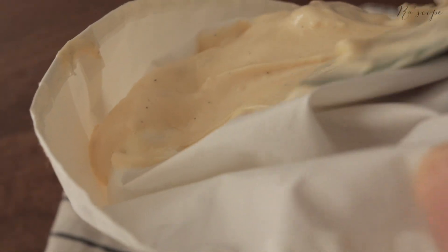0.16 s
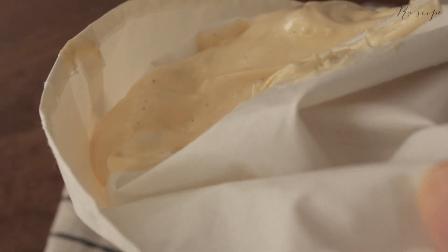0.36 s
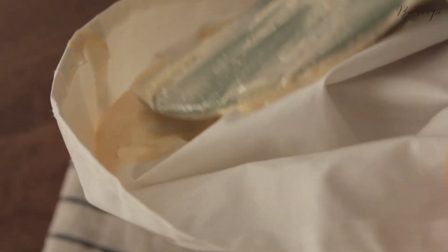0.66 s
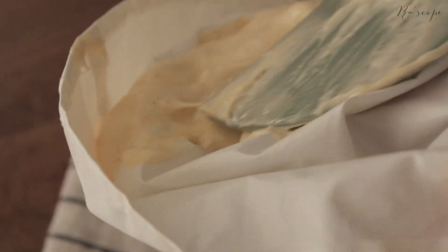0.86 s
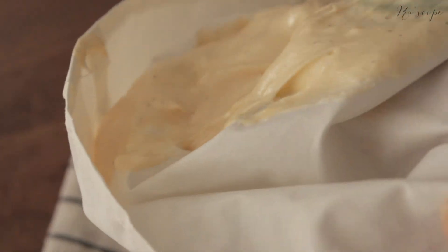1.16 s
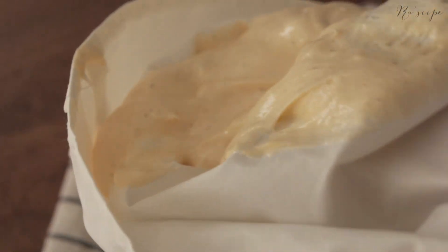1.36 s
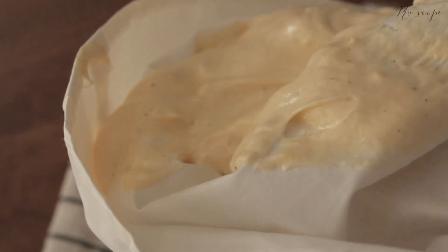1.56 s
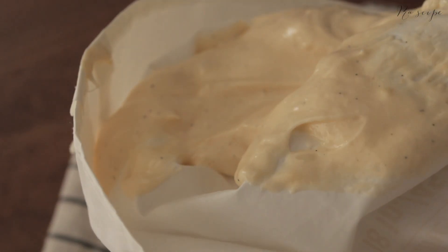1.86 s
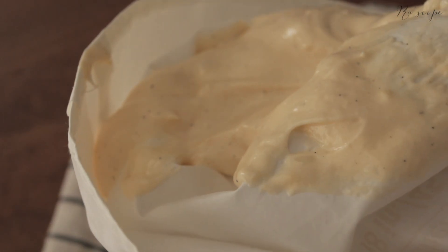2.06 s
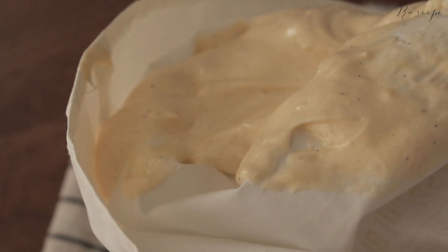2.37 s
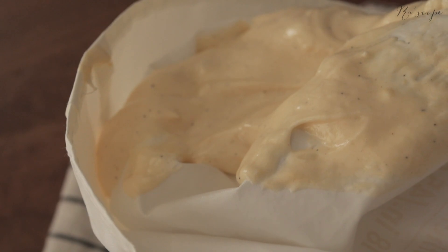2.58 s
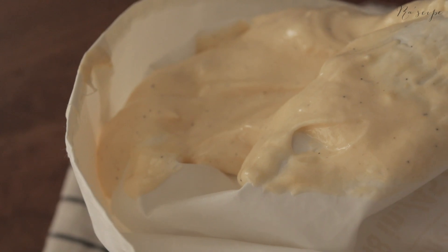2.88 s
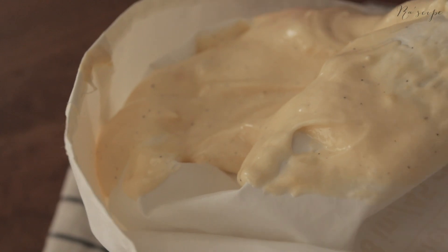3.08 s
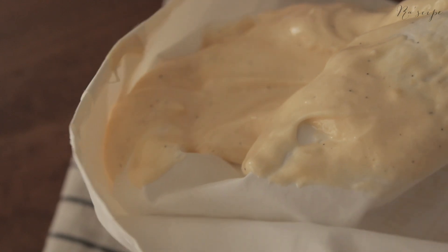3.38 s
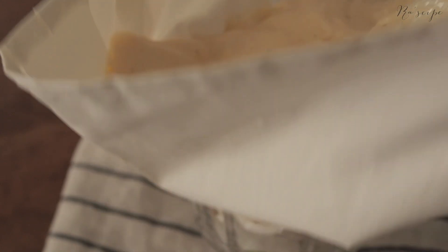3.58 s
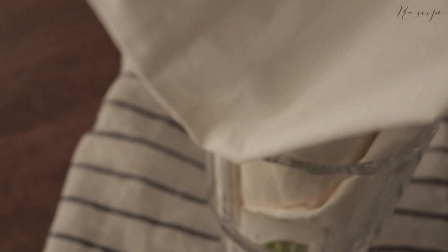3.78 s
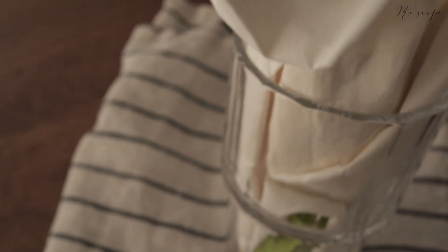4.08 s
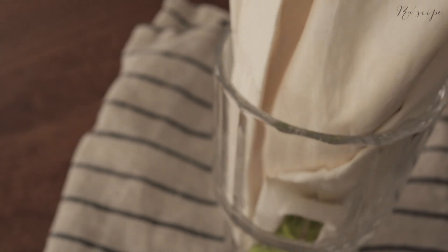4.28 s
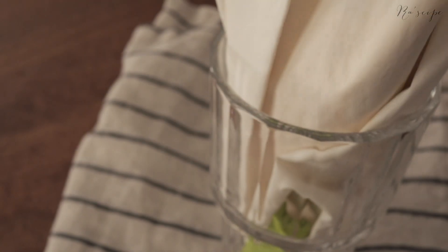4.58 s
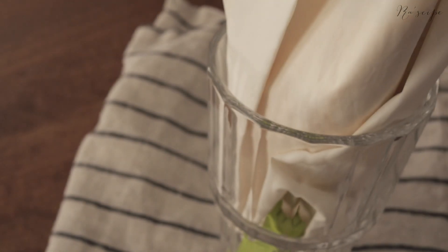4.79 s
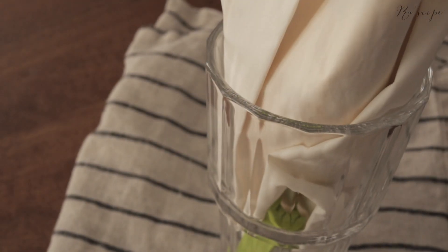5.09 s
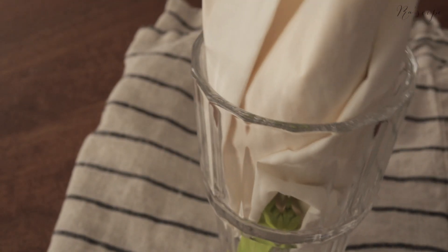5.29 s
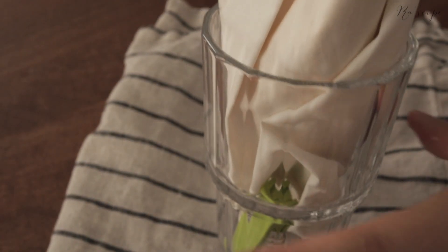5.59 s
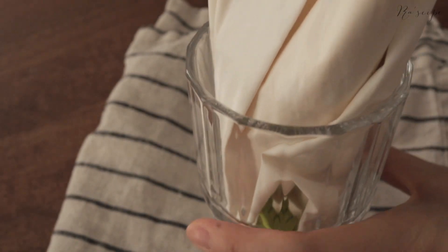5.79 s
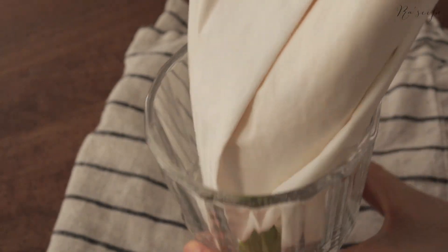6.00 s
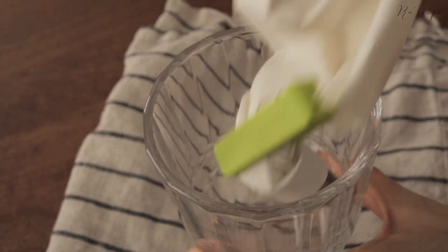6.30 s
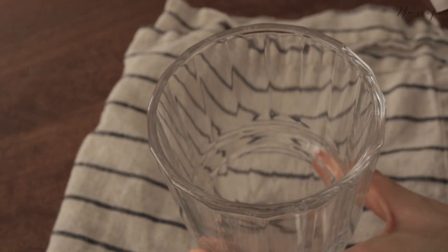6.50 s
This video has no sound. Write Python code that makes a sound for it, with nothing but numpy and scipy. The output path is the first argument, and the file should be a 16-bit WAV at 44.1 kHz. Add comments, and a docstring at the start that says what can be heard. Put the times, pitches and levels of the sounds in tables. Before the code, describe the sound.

Quiet, moist wiping and faint sheet rustle come first, briefly cut to silence and faded back in. After a calm pause a hollow woody bowl knock sounds behind. The filled bag is then gathered close to the microphone: dense crackling, dry rubbing, snapping folds and dull batter thuds. One last strong rustle, sparse bumps, then a little rim squeak and light glass taps in a small kitchen.

```python
"""A kitchen, microphone close to the hands: a stiff piping bag is filled with a spatula, folded shut
and lifted out of a drinking glass. The sheet is random grit, coloured and swelling with each stroke;
creases snap as short rings and the heavy batter thumps as low swings. The spatula knocks a bowl farther
off (dying modes with echoes). On the rim, regular slips squeak and grit sets the glass ringing.
Early on all sound stops at once and fades back in."""
import sys
import numpy as np
from scipy import signal
from scipy.fft import rfft, irfft
from scipy.io import wavfile
from scipy.ndimage import uniform_filter1d

SR = 44100
rng = np.random.default_rng(int(sys.argv[2]) if len(sys.argv) > 2 else 0)


def inscribe(sig):
    """Save sig as 16-bit PCM at rate SR to the path in sys.argv[1].

    A 1-D sig is mono; a 2-D sig holds one channel per row.
    Samples are clipped to [-1, 1] before scaling.
    """
    pcm = np.round(np.clip(np.atleast_2d(sig).T, -1, 1) * 32767)
    wavfile.write(sys.argv[1], SR, pcm.astype(np.int16))


def convert_level_to_amplitude(level_db):
    """Map a level in decibels to its linear amplitude factor."""
    exponent = np.asarray(level_db, float) / 20
    return 10 ** exponent


N = 293265  # samples

# Who is at work: t/s, share of the hands against spatula and room (0-1)
HANDS_SHARE = [(0, 0.08), (3.2, 0.05), (3.5, 0.88), (6.65, 0.95)]
# Strokes of the sliding sheet: peak t/s, rise/s, fall/s, rub level/dB, hiss/dB re rub, scrape/dB re rub
STROKES = [(0.165, 0.19, 0.12, -48, -14.5, -13), (0.28, 0.074, 0.1, -46, -6, -8.5),
           (0.53, 0.34, 0.1, -48.5, -15.5, -10.5), (0.74, 0.076, 0.05, -41.5, -11.5, -11),
           (0.87, 0.12, 0.09, -48.5, -14.5, -9), (1.0, 0.048, 0.051, -50.5, -2.5, -9),
           (1.075, 0.052, 0.075, -54.5, -3, -9), (1.17, 0.037, 0.083, -49, -5.5, -4),
           (1.245, 0.047, 0.05, -45, -2, 2), (1.469, 0.18, 0.18, -43.5, -8, -8.5),
           (1.712, 0.008, 0.031, -39.5, -6.5, -3.5), (1.78, 0.15, 0.23, -51, 1, -14),
           (2.882, 0.021, 0.048, -50, -35, -2.5), (2.946, 0.021, 0.14, -43.5, -35, -6.5),
           (3.01, 0.065, 0.051, -42, -1.5, -6), (3.231, 0.015, 0.071, -46, -4, -38),
           (3.32, 0.084, 0.085, -53, -30, -27), (3.385, 0.05, 0.053, -43.5, 1.5, -5),
           (3.48, 0.29, 0.15, -50, -22, -3), (3.57, 0.068, 0.085, -35.5, -1, -3),
           (3.72, 0.4, 0.081, -31, -3.5, 2), (3.85, 0.044, 0.15, -39.5, -16, 5.5),
           (3.985, 0.06, 0.035, -36, -22.5, 4.5), (4.069, 0.045, 0.29, -35, -5, 0.5),
           (4.19, 0.19, 0.33, -32.5, -7.5, 3.5), (4.432, 0.013, 0.04, -48.5, -10.5, 16),
           (4.47, 0.055, 0.22, -43, -34, 1.5), (4.621, 0.062, 0.1, -44, -5.5, -2),
           (4.754, 0.065, 0.061, -45.5, -12.5, -3.5), (4.851, 0.011, 0.055, -57, 13.5, 18.5),
           (4.905, 0.088, 0.029, -58, -17, 3), (4.996, 0.007, 0.019, -50.5, 0.5, 8),
           (5.19, 0.043, 0.07, -27.5, -4, 2.5), (5.258, 0.13, 0.044, -43.5, 7.5, -9.5),
           (5.41, 0.2, 0.11, -52.5, -19, 4.5), (5.974, 0.021, 0.19, -58, -18.5, -16),
           (6.176, 0.097, 0.16, -48.5, -11.5, -4), (6.335, 0.098, 0.087, -54, -4, -2),
           (6.494, 0.04, 0.028, -49.5, -1, -4)]
# Rub, hiss and scrape between strokes: level/dB
REST_LEVELS = [-79.5, -80, -71]
EDGE_DB = -23  # level of a stroke one rise before and one fall after its peak
RISE_FLATNESS, FALL_FLATNESS = 1.76, 1.33  # exponents: higher holds the top longer

# Spectra, only their shape counts: f/Hz, level/dB per Hz
# dry sheet rubbed by the hands
RUB_SPECTRUM = [(880, -25), (1500, -11), (2680, -5), (4060, -9), (7500, -21), (9750, -38.5), (16500, -120)]
# fine grit of the sheet
HISS_SPECTRUM = [(3530, -28), (6000, -1.5), (6700, -2.5), (9010, -5), (11000, -11.5), (14500, -18),
                 (16000, -23)]
# coarse grit of the sheet
SCRAPE_SPECTRUM = [(330, -4.5), (550, 4), (1300, 1), (1900, -9.5), (2600, -15.5)]
# edge of the spatula wiping the sheet
WIPE_SPECTRUM = [(1500, -28.5), (2200, -5), (3300, 2), (4300, 1.5), (6000, -0.5), (7500, -11), (10000, -37)]
# batter smearing under the spatula
SQUELCH_SPECTRUM = [(500, 0.5), (800, 0), (1050, -8.5), (1300, -0.5), (1600, -9.5), (2200, -5),
                    (2800, -16.5)]
# slow bending of the sheet
FLEX_SPECTRUM = [(29, -44.5), (50, -7), (119, 5), (231, -0.5), (386, -3), (471, -7), (1000, -36),
                 (1300, -54.5), (2200, -120)]
# rumble of the room
RUMBLE_SPECTRUM = [(29, -76.5), (50, -43), (113, -13), (211, -4.5), (328, -9), (367, -3), (740, -10),
                   (1000, -39.5), (1300, -66), (2200, -120)]

# Where the wiping is strongest: t/s, f/Hz
WIPE_FOCUS = [(0.15, 4920), (0.5, 3750), (0.74, 3520), (1.2, 4280), (1.47, 3240), (1.715, 3300),
              (1.77, 6600), (2.8, 2500)]
# Flexing and room rumble together: t/s, level/dB
LOW_LEVEL = [(0, -44), (1.0, -48.5), (1.2, -42), (2.53, -50.5), (3.06, -54), (3.31, -54), (3.6, -31),
             (3.8, -35), (4.47, -30), (4.82, -38.5), (4.93, -36.5), (5.1, -47.5), (5.2, -21.5),
             (5.31, -47.5), (5.6, -54.5), (5.7, -59), (5.94, -59.5), (6.03, -51), (6.25, -52),
             (6.45, -72.5)]
# Bands of a narrow fold: centre f/Hz, width/Hz, level/dB
FOLD_BANDS = [(4260, 700, 0), (5050, 190, 0), (5950, 330, 6.5), (7370, 370, 0.5), (8500, 350, -4),
              (10070, 960, -11)]
# Rubs inside the fold: peak t/s, rise/s, fall/s, level/dB
FOLD_RUBS = [(3.135, 0.014, 0.12, -58), (4.7, 0.022, 0.017, -33), (4.735, 0.029, 0.037, -36.5)]
# Short rubs where a small patch of sheet catches: peak t/s, rise/s, fall/s, level/dB, f/Hz, width/Hz
CATCHES = [(0.27, .05, .06, -54.5, 2080, 400), (0.725, 0.044, .05, -49, 2180, 350),
           (0.72, 0.037, 0.056, -46, 6040, 600), (0.865, 0.059, 0.077, -48, 1230, 650),
           (1.0, 0.067, 0.044, -53, 1350, 330), (4.745, 0.014, .04, -40, 1800, 500),
           (4.825, 0.017, .03, -50, 9200, 900), (5.82, .05, .04, -66, 2000, 900),
           (6.432, .015, .015, -50, 1760, 120)]
# Creases flipping over: t/s, level/dB, ring f/Hz, sharp edge level/dB re ring
SNAPS = [(0.2378, -31, 2430, -6), (0.6721, -27.5, 870, 3), (1.2499, -20, 1040, -29),
         (3.3803, -22.5, 730, -15), (3.4476, -4, 2500, -23), (3.4961, -13, 1080, -21),
         (3.505, -11, 1510, -10), (3.5616, -12.5, 870, -19.5), (3.668, -10, 1910, -12),
         (3.7186, -17, 1260, -6), (3.7377, -5.5, 2500, -7.5), (3.805, -15.5, 1590, -32),
         (3.82, -15, 1300, -23), (3.847, -7.5, 970, -8), (3.855, -4.5, 2380, -5), (3.877, -9, 940, -32),
         (3.931, -9, 1390, -9.5), (3.9836, -12.5, 2260, -15), (4.026, -14.5, 2500, -31),
         (4.0488, -15.5, 2900, -13), (4.0899, -6.5, 1350, -7.5), (4.274, -12, 1130, 1.5),
         (4.3775, -4, 740, -4.5), (4.3807, -9.5, 845, -25), (4.4766, 1, 960, -19),
         (4.514, -19.5, 1200, -10), (4.5621, -17.5, 720, -6), (4.6109, -10.5, 1150, -13),
         (4.7527, -15.5, 1820, -6), (4.773, -26, 1740, -5), (4.851, -6.5, 1300, -14),
         (4.861, -15.5, 5950, -3), (4.8904, -19, 2010, -4), (4.995, -31.5, 825, 6.5),
         (5.121, -20.5, 4600, -27), (5.17, -23, 1194, -10), (5.3216, -27.5, 1350, -9),
         (5.358, -14.5, 1240, -5.5), (5.403, -1.5, 1030, -47.5), (5.4609, -17.5, 1480, -41),
         (5.578, -21, 430, -45), (6.1293, -30.5, 1757, -5.5)]
# Thin bright ticks of the sheet peeling free: t/s, peak level/dB, f/Hz inside the band
TICKS = [(3.066, -38, 10100), (4.108, -28, 8000), (4.204, -29, 6540), (4.219, -27, 6440),
         (4.267, -31.5, 9500), (4.392, -38, 11570), (4.425, -32.5, 12950), (4.438, -37, 12500),
         (4.4766, -34.5, 8900), (6.561, -54, 7000)]
# The filled bag shifting or bumping the glass: t/s, level/dB, f/Hz at the peak of the swing
THUMPS = [(0.2268, -30, 280), (0.326, -21.5, 290), (0.6733, -18, 221), (1.2491, -17.5, 366),
          (1.722, -27.5, 447), (3.384, -21, 260), (3.4481, -12.5, 440), (3.649, -17, 257),
          (3.7244, -14.5, 161), (3.8568, -13, 210), (3.894, -18, 197.2), (3.9325, -15, 155),
          (4.0884, -9, 209), (4.3774, 0, 273), (4.4757, -7, 282), (4.56, -12.5, 223), (4.611, -15.5, 179),
          (4.6763, -19.5, 218), (4.743, -18.5, 160), (4.86, -10, 146), (4.8941, -11.5, 148),
          (4.9941, -18.5, 327.4), (5.0427, -21.5, 448), (5.139, -16, 192), (5.1774, -10, 382),
          (5.1994, -11, 213), (5.219, -12, 245), (5.3227, -22.5, 235), (5.402, -14, 398),
          (5.466, -25.5, 131.5), (5.5783, -9.5, 171.5), (5.8098, -35.5, 151.4)]

# The sheet sticking and slipping on the rim: start t/s, length/s, first slips/Hz, level/dB, unevenness
SQUEAKS = [(6.139, 0.027, 860, -26.5, 0.15), (6.162, 0.021, 915, -30.5, 0.29)]
# Harmonics 1, 2, 3 .. of the slips: level/dB
SLIP_HARMONICS = [-3.5, 1.5, 3.5, -10, -7.5, -4, -17, -16, -17, -20, -21]
# The bag dragging over the rim: peak t/s, rise/s, fall/s, drive level/dB at 3500 Hz, tilt/dB per octave
DRAGS = [(6.167, 0.0039, 0.017, -35, -1.5), (6.311, 0.011, 0.038, -40, 7.5), (6.349, 0.1, 0.14, -46, -4.5),
         (6.492, 0.037, 0.034, -30, 3.5), (6.551, 0.045, 0.15, -45.5, 0)]
# Modes of the drinking glass: f/Hz, level/dB, t60/s
GLASS_MODES = [(576, -24.5, 0.14), (1610, -18, 0.012), (2325, -8.5, 0.27), (5327, -8, 0.27),
               (5510, -7, 0.4), (5588, -4.5, 0.085), (9600, -26.5, 0.17), (10200, -27, 0.086),
               (13400, -42, 0.11)]
# The nozzle touching the wall of the glass: t/s, level/dB
NOZZLE_TAPS = [(6.308, -48), (6.479, -36.5)]
# Modes of the bowl: f/Hz, level/dB re knock, t60/s
BOWL_MODES = [(97, -23, 0.35), (229, -27, 0.4), (335.7, -1.5, 0.057), (435, -21.5, 0.5), (457, 0.5, 0.09),
              (481, -16, 0.25), (520, -5.5, 0.055), (700, -19, 0.068), (1300, 5.5, 0.0048),
              (1983, -29.5, 0.17), (2000, -25, 0.27), (2500, -17.5, 0.008), (3052, -34, 0.125),
              (4186, -37, 0.09), (5000, -30.5, 0.0049), (5600, -52, .08)]
# Decay of the kitchen: f/Hz, t60/s
KITCHEN_DECAY = [(100, 0.79), (500, 0.48), (2000, 0.35), (3200, 0.24)]


def handled(by_hands, otherwise, share):
    """Crossfade in power from spatula or room to the hands."""
    return np.sqrt(share) * by_hands + np.sqrt(1 - share) * otherwise


def sheet():
    """The close sheet: coarse, middle and fine grit over slow flexing, room rumble and faint air."""
    rub_gain, hiss_gain, scrape_gain = strokes()
    share = np.interp(np.arange(N) / SR, *np.transpose(HANDS_SHARE))
    hand_rub, hand_scrape = hands()
    wipe, squelch = spatula()
    rub = rub_gain * evened(handled(hand_rub, wipe, share))
    hiss = hiss_gain * fine_hiss()
    scrape = scrape_gain * handled(hand_scrape, squelch, share)
    low_gain = convert_level_to_amplitude(np.interp(np.arange(N) / SR, *np.transpose(LOW_LEVEL)))
    low = low_gain * handled(flexing(), room_rumble(), share)
    return rub + hiss + scrape + low + air(share)


def strokes():
    """Gains of rub, hiss and scrape: every stroke adds its power to the three layers."""
    power = convert_level_to_amplitude(2 * np.array(REST_LEVELS))[:, None] * np.ones(N)
    for *shape, rub_db, hiss_db, scrape_db in STROKES:
        levels = rub_db + np.array([0, hiss_db, scrape_db])
        power = power + convert_level_to_amplitude(2 * levels)[:, None] * swell(*shape)
    return np.sqrt(power)


def hands():
    """Dry sheet under the hands: one grit heard as rub and, with popping creases, as coarse scrape."""
    surface = patchy(grit(6500, 2.9), 2.95, size=256, flicker_db=2.0)
    scrape = evened(colour(surface, SCRAPE_SPECTRUM) + 0.65 * crackle())
    return colour(surface, RUB_SPECTRUM), scrape


def crackle():
    """Small creases pop at random, each with its own short ring; rms 1."""
    total = np.zeros(N)
    for hz in np.geomspace(700, 4500, 7):
        pop = burst(hz, 0.33, 0.27, 0, span=200)
        total += signal.oaconvolve(grit(40, 2.1), pop, "same")
    return evened(total)


def spatula():
    """Batter smooths the wiping: one softer grit heard as the wiping edge and as squelch."""
    wet = patchy(grit(9000, 2.3), 3.1, size=256, flicker_db=1.6)
    wipe = focus(colour(wet, WIPE_SPECTRUM), 3.7, 0.5)
    return wipe, colour(wet, SQUELCH_SPECTRUM)


def focus(x, lift_db, octaves):
    """A broad resonance that moves as the spatula changes its angle."""
    hz, t, z = signal.stft(x, SR, nperseg=256)
    centre_hz = np.interp(t, *np.transpose(WIPE_FOCUS))
    away = np.log2((hz[:, None] + 1) / centre_hz) / octaves
    lift = convert_level_to_amplitude(lift_db * np.exp(-away ** 2))
    return evened(signal.istft(z * lift, nperseg=256)[1][:N])


def fine_hiss():
    """Dense, even slips of the sheet give its treble."""
    return colour(patchy(grit(20000, 1.2), 2.9, size=256, flicker_db=3.0), HISS_SPECTRUM)


def flexing():
    """The sheet bends in jerks: sparse grit in the bass."""
    return colour(patchy(grit(700, 0.91), 3.2, size=1024, flicker_db=5.0), FLEX_SPECTRUM)


def fold():
    """Grit inside a narrow fold comes out in several bands."""
    hz = np.fft.rfftfreq(N, 1 / SR)
    bands = np.zeros(len(hz))
    for centre_hz, width, db in FOLD_BANDS:
        bands += convert_level_to_amplitude(db) / (1 + (2 * (hz - centre_hz) / width) ** 2) ** 1.2
    gain = np.sqrt(sum(convert_level_to_amplitude(2 * db) * swell(*shape) for *shape, db in FOLD_RUBS))
    return gain * evened(irfft(rfft(grit(5300, 2.6)) * bands, N))


def catches():
    """Grit through one broad resonance for each rub."""
    hz = np.fft.rfftfreq(N, 1 / SR)
    slips = rfft(grit(4000, 2.7))
    out = np.zeros(N)
    for *shape, db, centre_hz, width in CATCHES:
        band = 1 / (1 + (2 * (hz - centre_hz) / width) ** 4)
        out += convert_level_to_amplitude(db) * np.sqrt(swell(*shape)) * evened(irfft(slips * band, N))
    return out


def snaps():
    """A crease flips: a cycle or two of ring, a sharp edge, then a short rattle of the sheet."""
    out, span = np.zeros(N), 1500
    t = np.arange(-span, span) / SR
    rattle_band = signal.butter(2, [500, 3500], "band", fs=SR)
    for s, db, hz, edge_db in SNAPS:
        body = rng.choice([-1, 1]) * burst(hz, 0.25, 0.36, 0, span=span)
        body = signal.filtfilt(*signal.butter(2, 2.1 * hz, fs=SR), body)
        # every crease has its own colour
        edge_hz = 4400 * 2 ** (0.46 * np.clip(rng.standard_normal(), -2, 2))
        edge_band = signal.butter(3, [edge_hz / 1.45, edge_hz * 1.47], "band", fs=SR)
        edge = rng.standard_normal(len(t)) * np.exp(-np.abs(t + 0.000067) / 0.00052)
        edge = signal.lfilter(*edge_band, edge)
        rattle = rng.standard_normal(len(t)) * (t > 0) * convert_level_to_amplitude(-12.0 - 60 * t / 0.018)
        rattle = signal.lfilter(*rattle_band, rattle)
        dull = signal.butter(3, min(5.02 * hz, SR * .45), fs=SR)
        snap = signal.filtfilt(*dull, body + convert_level_to_amplitude(edge_db) * edge / abs(edge).max() + rattle)
        # the facing wall of the crease answers at once
        gap = round(SR * 0.00027 * 2 ** np.clip(rng.standard_normal(), -1, 1))
        add(out, s - span / SR, convert_level_to_amplitude(db) * (snap - 0.29 * np.roll(snap, gap)))
    return out


def ticks():
    """Each tick is a very short puff of noise in a wide band."""
    out, span = np.zeros(N), 400
    t = np.arange(-span, span) / SR
    for s, db, hz in TICKS:
        band = signal.butter(2, [hz / 1.7, hz * 1.3], "band", fs=SR)
        puff = rng.standard_normal(len(t)) * np.exp(-np.abs(t) / .0009)
        puff = signal.filtfilt(*band, puff)
        add(out, s - span / SR, convert_level_to_amplitude(db) * puff / abs(puff).max())
    return out


def thumps():
    """Soft pushes of the heavy batter: one low swing and a short wobble."""
    out, span = np.zeros(N), 3000
    for s, db, hz in THUMPS:
        swing = burst(hz, .22, 0.41, 0.44, span=span)
        swing = signal.filtfilt(*signal.butter(2, 4.5 * hz, fs=SR), swing)
        add(out, s - span / SR, rng.choice([-1, 1]) * convert_level_to_amplitude(db) * swing)
    return out


def squeak():
    """Regular slips that speed up make a rising stack of harmonics with one-sided peaks."""
    out = np.zeros(N)
    speedup = 3340  # slips per s gained each second
    for s, length, per_s, db, jitter in SQUEAKS:
        t = np.arange(0, length, 1 / SR)
        shake = uniform_filter1d(rng.standard_normal(4000), size=60)[:len(t)]
        turns = np.cumsum((per_s + speedup * t) * (1 + jitter * shake)) / SR
        slips = np.zeros(len(t))
        for k, harmonic_db in enumerate(SLIP_HARMONICS, start=1):
            slips -= convert_level_to_amplitude(harmonic_db) * np.cos(2 * np.pi * k * turns)
        shape = np.sin(np.pi * (t / length) ** (1 / 0.69))  # tops after the middle
        add(out, s, convert_level_to_amplitude(db) * shape * evened(slips))
    return out


def glass():
    """The drag feeds grit into the modes of the glass; an uneven wall splits each into a beating pair."""
    first_s, first_rise_s = DRAGS[0][:2]
    start = round((first_s - 2 * first_rise_s) * SR)
    shapes = [swell(*row[:3])[start:] for row in DRAGS]
    # each mode swells in over about 3 ms, which keeps its band narrow
    swell_in = 1 - np.exp(-(np.arange(SR // 2) / SR / .003) ** 2)
    out = np.zeros(N)
    for hz, mode_db, t60 in GLASS_MODES:
        octaves = np.log2(hz / 3500)
        power = np.zeros(N - start)
        for shape, (*_, db, tilt) in zip(shapes, DRAGS):
            power += convert_level_to_amplitude(2 * (db + tilt * octaves)) * shape
        push = evened(grit(2700, 3.9))[start:] * np.sqrt(power)
        mode = ring(hz, t60, SR // 2) + 0.45 * ring(hz * 1.005, 0.8 * t60, SR // 2)
        mode = mode * swell_in
        out[start:] += convert_level_to_amplitude(mode_db) * signal.fftconvolve(push, mode / np.linalg.norm(mode))[:N - start]
    return out


def taps():
    """A tap starts two halves of one wall mode against each other: the note swells in and beats."""
    out = np.zeros(N)
    hz, _, t60 = GLASS_MODES[2]
    note = ring(hz, 1.8 * t60, SR // 2) - ring(hz * .995, 1.3 * t60, SR // 2)
    for s, db in NOZZLE_TAPS:
        add(out, s, convert_level_to_amplitude(db) * note)
    return out


def knock():
    """The spatula strikes a bowl on the wooden table; each mode takes about a cycle to build."""
    out, t = np.zeros(N), np.arange(SR // 2) / SR
    modes = np.zeros(len(t))
    for hz, db, t60 in BOWL_MODES:
        build = 1 - np.exp(-(t * hz / 0.76) ** 2)
        modes += convert_level_to_amplitude(db) * ring(hz, t60, len(t)) * build
    add(out, 2.5455, convert_level_to_amplitude(-3.5) * modes)
    return out


def kitchen(x):
    """Echoes of random sign off the room, each band dying at its own speed."""
    echoes = np.zeros(SR // 2)
    at = np.arange(200, len(echoes) - 20, 20)
    echoes[at + rng.integers(0, 20, len(at))] = rng.choice([-1., 1.], len(at))
    hz, t, z = signal.stft(echoes, SR, nperseg=256)
    decay = convert_level_to_amplitude(-60 * t / read(KITCHEN_DECAY, hz)[:, None])
    tail = signal.istft(z * decay, SR, nperseg=256)[1]
    return signal.fftconvolve(x, tail / np.linalg.norm(tail))[:N]


def room_rumble():
    """Steady low noise of the room."""
    return colour(rng.standard_normal(N), RUMBLE_SPECTRUM)


def air(share):
    """Faint hiss, weaker by up to 5.9 dB as the hands take over."""
    noise = signal.lfilter([1], [1, -.7], rng.standard_normal(N))
    return convert_level_to_amplitude(-76 - 5.9 * share) * evened(noise)


def grit(per_s, spread_db):
    """Tiny slips of the surface: random clicks, a few of them large."""
    size = convert_level_to_amplitude(spread_db * np.minimum(rng.exponential(1, N), 5))
    return size * rng.standard_normal(N) * (rng.random(N) < per_s / SR)


def patchy(x, depth_db, size, flicker_db):
    """Folds open and close, so patches of the spectrum swell and fade and the whole flickers."""
    z = signal.stft(x, nperseg=size)[2]
    patches = uniform_filter1d(rng.standard_normal(z.shape), size=4, axis=0)
    patches = evened(uniform_filter1d(patches, size=22, axis=1))
    flicker = evened(uniform_filter1d(rng.standard_normal(z.shape[1]), size=3))
    gain = convert_level_to_amplitude(depth_db * patches + flicker_db * flicker)
    return evened(signal.istft(z * gain, nperseg=size)[1][:N])


def swell(peak_s, rise_s, fall_s):
    """Power of one smooth stroke, 1 at its peak."""
    t = np.arange(N) / SR - peak_s
    rise = np.abs(t / rise_s) ** RISE_FLATNESS
    fall = np.abs(t / fall_s) ** FALL_FLATNESS
    return convert_level_to_amplitude(np.maximum(2 * EDGE_DB * np.where(t < 0, rise, fall), -300))


def burst(hz, rise, fall, sag, span):
    """A tone peaking mid-array, rise and fall in cycles; its pitch is lower by sag away from the peak."""
    turns = np.arange(-span, span) / SR * hz
    rising = np.exp(-(turns / rise) ** 2)
    falling = np.exp(1 - np.hypot(1, turns / fall))
    phase = (1 - sag) * turns + sag * np.tanh(turns)
    return np.where(turns < 0, rising, falling) * np.cos(2 * np.pi * phase)


def ring(hz, t60, length):
    """One dying mode."""
    t = np.arange(length) / SR
    return convert_level_to_amplitude(-60 * t / t60) * np.sin(2 * np.pi * hz * t)


def evened(x):
    """Scales to rms 1."""
    return x / np.sqrt(np.mean(x ** 2) + 1e-20)


def read(points, hz):
    """A spectrum table read on a log-frequency axis."""
    f, value = np.transpose(points)
    return np.interp(np.log(hz + 1), np.log(f + 1), value)


def colour(x, points):
    """Gives x the spectrum of a table, silent outside it; rms 1."""
    hz = np.fft.rfftfreq(len(x), 1 / SR)
    inside = (hz > points[0][0]) & (hz < points[-1][0])
    return evened(irfft(rfft(x) * convert_level_to_amplitude(read(points, hz)) * inside, len(x)))


def add(mix, s, sound):
    """Mixes a sound in at s seconds."""
    part = mix[round(s * SR):][:len(sound)]
    part += sound[:len(part)]


def scene():
    """All sources near the centre; the bowl stands farther off in the room."""
    near = snaps() + ticks() + thumps() + squeak()
    far = knock()
    echoes = kitchen(convert_level_to_amplitude(-21.5) * near + convert_level_to_amplitude(-9.0) * far)
    mid = near + far + echoes + sheet() + fold() + catches() + glass() + taps()
    # all sound stops at 1.027 s and fades back in over 0.098 s
    since = np.arange(N) / SR - 1.027
    mid = mid * np.where(since < 0, 1, np.clip(since / 0.098, 0, 1))
    treble = signal.lfilter(*signal.butter(1, 1500, "high", fs=SR), mid)
    side = convert_level_to_amplitude(-32) * np.roll(treble, 9)  # a trace of width, 9 samples late
    return np.array([mid + side, mid - side])


def roll_off(x):
    """The treble ends steeply here."""
    return signal.sosfilt(signal.butter(12, 16420, fs=SR, output="sos"), x)


def record(dry):
    """The close microphone drops the deep bass; the sound is band-limited just above 16 kHz and clipped."""
    bass_cut = signal.butter(3, 70, "high", fs=SR, output="sos")
    band_limit = signal.firwin(255, 16100, window=("kaiser", 8), fs=SR)
    heard = signal.oaconvolve(signal.sosfilt(bass_cut, dry), band_limit[None], "same")
    mix = np.clip(heard, -1, 1)  # full scale
    return roll_off(mix)


dry = scene()
out = record(dry)
inscribe(out)
```